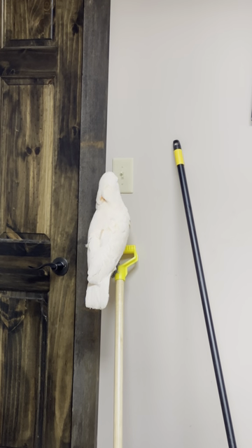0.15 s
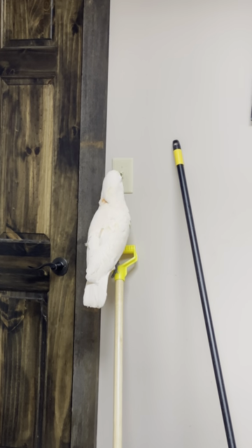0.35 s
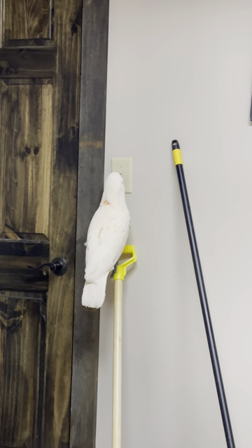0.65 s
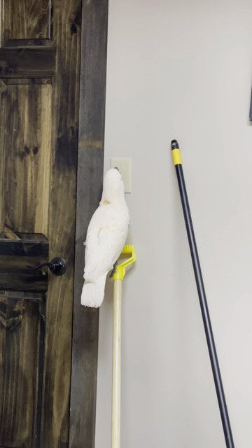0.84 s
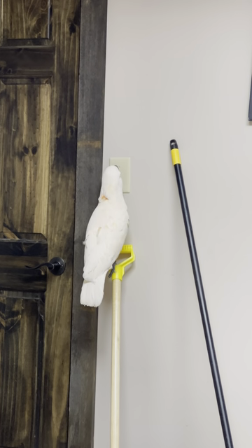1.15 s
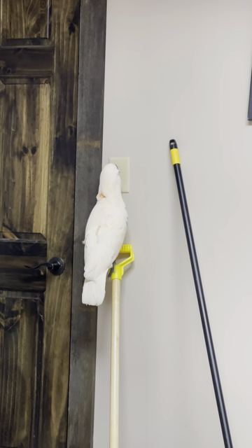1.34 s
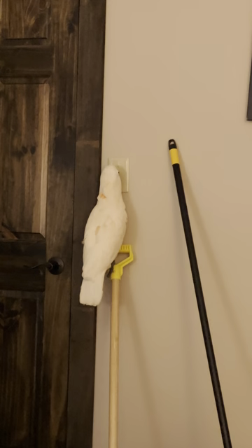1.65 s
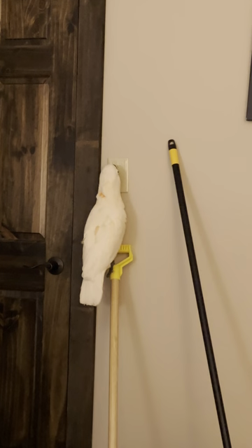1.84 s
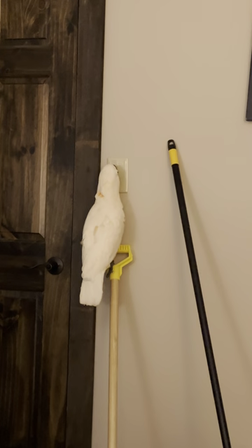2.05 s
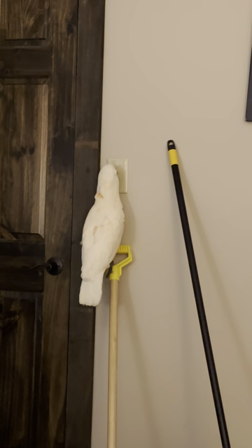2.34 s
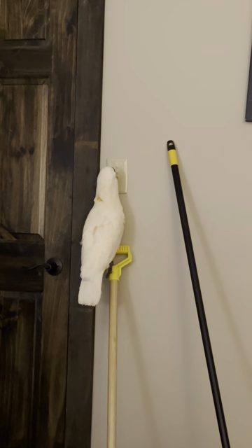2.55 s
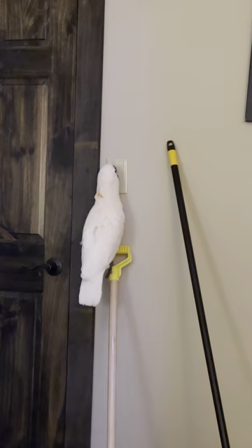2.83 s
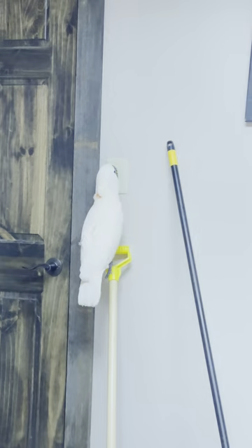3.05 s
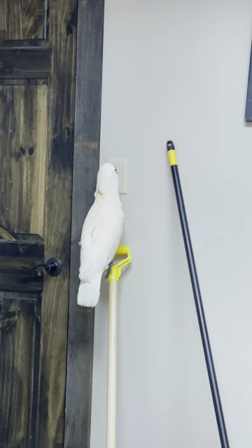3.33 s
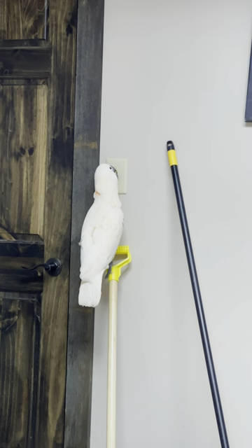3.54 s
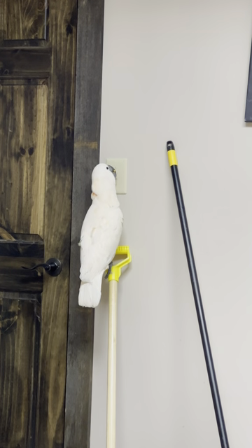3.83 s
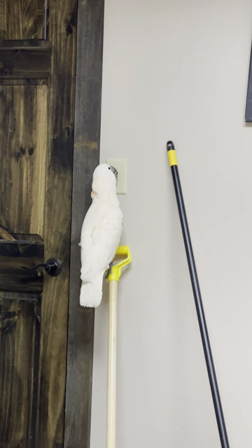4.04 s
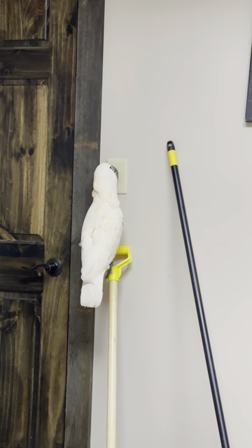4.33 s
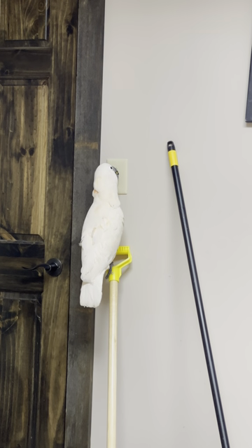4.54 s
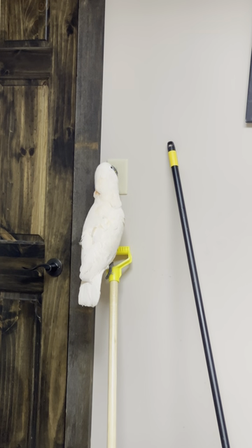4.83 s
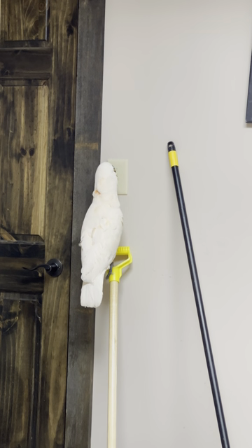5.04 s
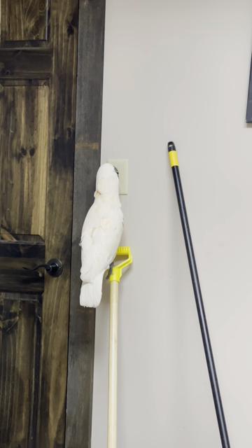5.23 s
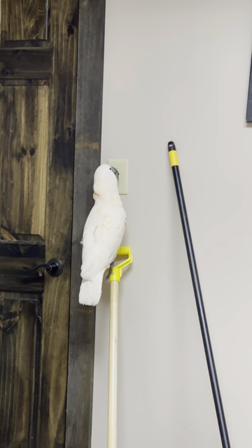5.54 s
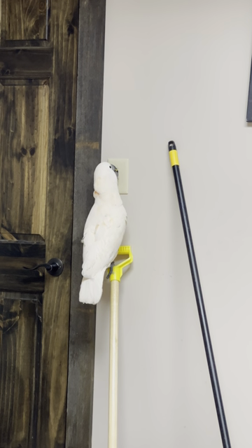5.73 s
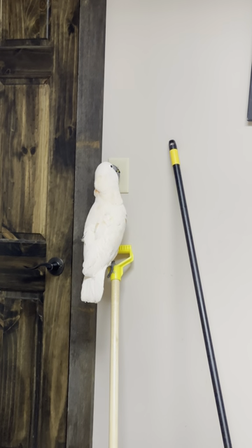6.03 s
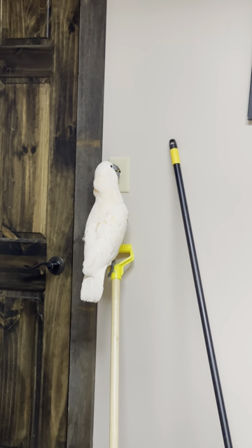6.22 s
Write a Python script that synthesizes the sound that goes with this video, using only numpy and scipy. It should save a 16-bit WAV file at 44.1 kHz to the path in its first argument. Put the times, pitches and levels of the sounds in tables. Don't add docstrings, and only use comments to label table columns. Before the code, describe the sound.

Close, dry beak knocks on a plastic switch plate arrive in irregular clusters, each with a small click, a hollow wall thump and a brief indoor echo. Scratchy slides fill some gaps. The toggle clacks loudly early on and several times near the end. Behind it lie steady soft room rumble, slight microphone hiss and a very faint high electrical whine.

```python
import sys
import numpy as np
from scipy import signal
from scipy.fft import rfft, irfft
from scipy.io import wavfile
from scipy.ndimage import uniform_filter1d

SR = 44100
rng = np.random.default_rng(int(sys.argv[2]) if len(sys.argv) > 2 else 0)


def volts(x):
    e = np.asarray(x, float) / 20
    return 10 ** e


def unload_wav(signal):
    wavfile.write(
        sys.argv[1],
        SR,
        np.round(np.clip(np.atleast_2d(signal).T, -1, 1) * 32767).astype(np.int16),
    )


N = 281358

# f/Hz, level/dB
EDGE_CLICK = [(800, -35.5), (1300, -16), (1650, 4), (2000, 2.5), (2700, 5), (3500, -2), (4400, -6.5),
              (5500, -10.5), (8000, -31)]


def evened(x):
    return x / np.sqrt(np.mean(x ** 2) + 1e-20)


def read(points, hz):
    f, value = np.transpose(points)
    return np.interp(np.log(hz + 1), np.log(f + 1), value)


def add(mix, s, sound):
    part = mix[round(s * SR):][:len(sound)]
    part += sound[:len(part)]


def colour(x, points):
    size = x.shape[-1]
    return irfft(rfft(x) * volts(read(points, np.fft.rfftfreq(size, 1 / SR))), size)


def background():
    # f/Hz, density/dB per Hz
    rumble_spectrum = [(12, -26), (20, -2), (123, -7.5), (166, -9.5), (256, -16), (292, -23), (430, -27),
                       (501, -29), (805, -29), (937, -40), (1100, -37.5), (1300, -44.5), (1720, -49),
                       (1950, -53), (3500, -62), (4550, -100), (7700, -120)]
    # f/Hz, level/dB
    whine_spectrum = [(9200, -27), (9700, -22.5), (10100, 1.5), (10350, 7.5), (10600, -39.5), (10800, -52)]
    rumble, hiss, whine = rng.standard_normal((3, 2, N))
    fade = volts(-53.5 - 0.72 * np.arange(N) / SR)
    rumble = fade * evened(colour(rumble, rumble_spectrum))
    hiss = volts(-90) * colour(hiss, [(2000, 7.0), (5000, -1.5), (9300, 3.5), (10800, -33)])
    whine = volts(-73) * evened(colour(whine, whine_spectrum))
    return rumble + hiss + whine


def room(noise):
    # f/Hz, t60/s
    decay = [(100, 1), (200, 0.32), (400, 0.36), (1000, 0.21), (2800, 0.25), (5000, 0.21), (8000, 0.19),
             (12000, 0.078)]
    # f/Hz, level/dB
    late_decay = [(500, -30.5), (1000, -36), (1400, -24.5), (1900, -42), (3000, -46.5), (6000, -36.5)]
    late_t60 = 0.41
    hz, t, z = signal.stft(noise, SR, nperseg=256)
    early = volts(-60 * t / read(decay, hz)[:, None])
    late = volts(read(late_decay, hz)[:, None] - 60 * t / late_t60)
    tail = signal.istft(z * (early + late), SR, nperseg=256)[1]
    t = np.arange(tail.shape[1]) / SR
    tail = tail * np.clip((t - .001) / 0.0071, 0, 1)
    return tail / np.linalg.norm(tail[0])


def ring(modes):
    t = np.arange(12000) / SR
    body = sum(volts(db - 60 * t / t60) * np.sin(2 * np.pi * hz * t) for hz, db, t60 in modes)
    return body / abs(body).max()


def click(points):
    log_gain = np.log(volts(read(points, abs(np.fft.fftfreq(8192, 1 / SR)))))
    pulse = np.fft.ifft(np.exp(np.conj(signal.hilbert(log_gain)))).real[:2048]
    return pulse / abs(pulse).max()


def strike(drive, pulse):
    out = signal.fftconvolve(drive, pulse)[:len(drive)]
    return out / abs(out).max()


def contact(noise, length, grit_db):
    t = np.arange(len(noise)) / SR
    length = max(length, .0003)
    grit = volts(grit_db * evened(uniform_filter1d(noise[::-1], size=24)))
    swell = 1 - np.exp(-t / (0.22 * length))
    return noise * grit * swell * np.exp(-t / length)


def detuned(modes, chance, spread_db):
    return [(hz, db + spread_db * a, t60) for (hz, db, t60), a in zip(modes, chance)]


def boom(db, hz, t60, swell):
    t = np.arange(30000) / SR
    return volts(db - 60 * t / t60) * (1 - np.exp(-t / swell)) * np.sin(2 * np.pi * hz * t) * 2


def cavity_booms():
    # t/s, level/dB
    firm_blows = [(0.461, -48), (0.639, -61), (0.959, -50.5), (1.152, -50), (1.561, -51.5), (3.311, -45.5),
                  (3.822, -51.5), (4.009, -48.5), (4.202, -49.5), (4.37, -43), (4.9, -47.5), (5.158, -45),
                  (5.719, -44), (5.812, -44), (5.94, -50), (6.272, -55)]
    return [(s, boom(db, hz=154.14, t60=0.42, swell=0.03)) for s, db in firm_blows]


def frame_jolt():
    # level/dB, f/Hz, t60/s, swell/s
    frame_modes = [(-34, 286, .26, 0.048), (-35.5, 229, 0.29, 0.022), (-48.5, 91.2, 0.56, 0.016),
                   (-45, 150, 0.11, 0.0027)]
    return [(0.01894, boom(*mode)) for mode in frame_modes]


def wall(drive, chance):
    # f/Hz, level/dB
    thump = [(60, -38.5), (150, 6), (250, 0.5), (450, 6.5), (800, -1), (1280, -9), (1500, -31), (3000, -55)]
    # f/Hz, level/dB, t60/s
    panel = [(120.4, -2.5, 0.63), (230, 3, 0.087), (366, 9, 0.24), (402, -16.5, 0.03), (499.8, -3.5, 0.77),
             (582, -25, 0.037), (679.6, 9.5, 0.1), (1020, -1, 0.18)]
    hum = strike(drive, ring(detuned(panel, chance, 4)))
    return strike(drive, click(thump)) + volts(-10.5) * hum


def bright(drive, db):
    # f/Hz, level/dB
    tick = [(2500, -13), (3900, -8.5), (4500, -2), (5200, -3), (6000, -5.5), (7500, -2.5), (9000, -4.5),
            (10000, -26), (12000, -42)]
    # f/Hz, level/dB
    sheen = [(7000, -56.5), (8500, 16.5), (10300, 12), (11300, 12), (12300, -7.5), (13500, -55)]
    sheen_db = min(.8 * (db + 35.0), 3)
    return volts(db) * (strike(drive, click(tick)) + volts(sheen_db) * strike(drive, click(sheen)))


def spots():
    # t/s, level/dB, f/Hz
    accents = [(0.017, -38.5, 3360), (.018, -37, 512), (.459, -56, 1190), (.592, -54.5, 1220),
               (.637, -58, 1200), (1.917, -48.5, 1320), (2.829, -44.5, 1170), (3.308, -50, 1180),
               (4.012, -61, 1200), (5.157, -36.5, 1430), (5.939, -34.5, 1350), (.802, -57, 4180),
               (1.152, -46.5, 1300), (1.398, -64.5, 1320), (1.858, -52, 1370), (2.073, -52.5, 1550),
               (2.336, -56, 2400), (2.498, -54.5, 1020), (4.372, -39, 694), (.643, -57.5, 2700),
               (4.901, -35, 4770), (4.915, -45, 4360), (5.583, -75, 2720), (.958, -50.5, 1240),
               (1.272, -69, 2620), (4.372, -54.5, 1250)]
    # f/Hz, level/dB, t60/s
    box = [(10100, -40, 0.0086), (1530, -33.5, 0.014), (4050, -43.5, .03), (727, -35.5, .05),
           (775, -37, .07), (1800, -39.5, .03), (2500, -48, 0.031), (4030, -57, 0.16), (4200, -60.5, 0.12)]
    # f/Hz, level/dB, t60/s
    box_hum = (1020, -40, .13)
    rung = []
    for s, db, hz in accents:
        t60 = 0.019 * (1000 / hz) ** 0.37
        rung.append((s, volts(db) * ring([(hz, 0, t60)])))
    rung += [(1.558, volts(db) * ring([(hz, 0, t60)])) for hz, db, t60 in box + [box_hum]]
    return [(s, sound, volts(-1) * sound) for s, sound in rung]


def slides():
    # t/s, level/dB, wall thud re level/dB, contact/s
    scrapes = [(0.7983, -55.5, 1.5, 0.011), (0.8726, -55, -2, 0.024), (1.0555, -62, 3, 0.014),
               (1.6989, -66, 2, 0.046), (1.7998, -58.5, 11.5, 0.0097), (1.9398, -64, 17, 0.014),
               (2.4356, -65, 8, 0.026), (2.7127, -71.5, 11, 0.014), (2.7373, -53.5, -30, 0.023),
               (2.7595, -55, 1.5, 0.014), (2.789, -53.5, -5.5, 0.029), (3.1119, -55, -2.5, 0.02),
               (3.1394, -58.5, -1.5, 0.009), (3.1998, -68, -1, 0.021), (3.283, -59.5, -2, 0.011),
               (3.6106, -75, 8, 0.015), (4.2182, -49.5, -8.5, 0.017), (5.2912, -61.5, 8, 0.0033),
               (5.4912, -66, 11.5, 0.0067), (5.7345, -47, 0, 0.014), (6.217, -70, -12, 0.039),
               (6.281, -74, 3, 0.0023)]
    # t/s, level/dB, f/Hz, wall thud re level/dB, tick re level/dB
    flicks = [(0.152, -64.5, 4460, -12, -35), (2.4874, -59.5, 4700, 0, -20), (3.111, -58, 3760, -1, -21),
              (2.708, -68, 3280, 0, -25), (3.5, -73.5, 2500, -2.5, -20), (3.7188, -80, 1860, 11, 1.5),
              (4.8928, -46, 2420, -4, -2), (5.5814, -68, 2580, -18, -15), (6.167, -70.5, 2560, -3, -3)]
    # t/s, level/dB, f/Hz,
    # length/s
    soft_sounds = [(1.738, -69.5, 2500, 0.035), (3.81, -55, 1800, 0.017), (4.188, -56, 1500, 0.016),
                   (5.5, -74, 2300, .05), (0.898, -71, 2720, 0.032), (6.26, -63, 2200, 0.015),
                   (.5, -75.5, 2600, 0.033), (0.661, -66, 2000, 0.021), (3.19, -74.5, 3170, .05),
                   (5.201, -62.5, 1380, 0.081), (5.3, -61, 1350, 0.75), (6.02, -67.5, 1270, 0.13)]
    tick_db, soft_thud_db, flick_s = -42, -3, 0.019
    spot = 2130 * (1 + 0.054 * rng.standard_normal(len(scrapes)))
    return ([(s, db, hz, thud, tick_db, length) for (s, db, thud, length), hz in zip(scrapes, spot)]
            + [(*row, flick_s) for row in flicks]
            + [(s, db, hz, soft_thud_db, tick_db, length) for s, db, hz, length in soft_sounds])


def scrape(row, noise):
    s, db, hz, thud_db, tick_db, length = row
    slips = contact(noise[0], length, 2.97)
    plastic = strike(slips, ring([(hz, 0, .003)])) + 0.13 * strike(slips, click(EDGE_CLICK))
    thud = volts(thud_db + 1.5) * wall(slips, noise[1])
    return volts(db) * (plastic + thud) + bright(slips, db + tick_db + 3.5)


def toggle_ping():
    # f/Hz, level/dB, t60/s
    toggle = [(1615, 0, .014), (1150, -9, .01), (3950, -9, .02), (5460, -11, .015), (6780, -16, .012),
              (8000, -22, .008)]
    ping = volts(-43) * strike(np.pad(np.hanning(11), (20, 4000)), ring(toggle))
    return [(5.4105, ping, volts(-17) * ping)]


def knocks():
    # t/s, plate/dB, edge re plate/dB, tick re plate/dB, plate f/Hz
    snaps = [
        (1.55, -37.5, 0.5, -7, 925),
        (1.556, -35, -4.5, -25, 1010),
        (4.901, -40.5, -17, -11.5, 760),
        (4.911, -41.5, -16, -44, 1014),
        (5.156, -33, -11.5, -22.5, 1310),
        (5.936, -33.5, -9, -18.5, 1296),
    ]
    # t/s, plate/dB, edge re plate/dB, tick re plate/dB, plate f/Hz
    pecks = [(0.015, -45, 5, -10.5, 1480), (1.269, -62.5, -6, -10, 970), (3.955, -59, 7, -22, 957),
             (4.196, -53, -3, -24, 1370), (4.335, -57.5, 4.5, -15.5, 1090), (5.723, -50, 0, -7.5, 1010)]
    # t/s, plate/dB, wall thud re plate/dB, plate f/Hz
    pushes = [(0.458, -54.5, 9.5, 750), (0.637, -46.5, 1.5, 905), (1.397, -68.5, 3, 1340),
              (1.484, -65.5, 12.5, 835), (1.729, -56.5, 10, 904), (2.272, -72, 19, 790),
              (3.498, -64, 14.5, 740), (6.261, -58.5, 9, 743)]
    # t/s, plate/dB, wall thud re plate/dB, edge re plate/dB, plate f/Hz
    taps = [(0.591, -56.5, 2.5, -12, 1250), (0.747, -42.5, -3.5, -9, 830), (0.959, -44, -4, -11.5, 785),
            (1.148, -52.5, 0.5, -7.5, 1310), (1.86, -52, -4, -7.5, 1660), (1.916, -51, -1.5, -13, 830),
            (2.011, -53.5, -2.5, -7, 925), (2.072, -49.5, -7, -11, 1360), (2.329, -57.5, 0.5, -5, 1050),
            (2.829, -51.5, 4.5, -4, 776), (2.889, -55.5, -10, -1.5, 885), (3.309, -39.5, -2, -15, 767),
            (3.817, -53.5, 5, -1, 840), (3.871, -51, 0.5, -1.5, 1370), (4.008, -52.5, 9, -10.5, 1220),
            (4.371, -45, 7, -8.5, 1250), (5.809, -53, 3.5, -0.5, 815)]
    snap_thud_db, peck_thud_db, push_edge_db, push_tick_db, tap_tick_db = -8, 4.5, -27, -44, -39
    return ([(s, db, snap_thud_db, edge, tick, hz) for s, db, edge, tick, hz in snaps]
            + [(s, db, peck_thud_db, edge, tick, hz) for s, db, edge, tick, hz in pecks]
            + [(s, db, thud, push_edge_db, push_tick_db, hz) for s, db, thud, hz in pushes]
            + [(s, db, thud, edge, tap_tick_db, hz) for s, db, thud, edge, hz in taps])


def knock(row, noise):
    s, db, thud_db, edge_db, tick_db, hz = row
    blow = np.pad([1.], (0, len(noise[0]) - 1))
    rattle = contact(noise[0], 0.0025, 15.0)
    plate_modes = ring([(hz, 0, .018), (hz * 1.345, -4, .01)])
    plate = volts(db + 0.5) * strike(np.pad(np.hanning(24), (0, 11976)), plate_modes)

    def rest(drive):
        thud = volts(thud_db) * wall(drive, noise[1])
        edge = volts(edge_db + 3) * strike(drive, click(EDGE_CLICK))
        return volts(db) * (thud + edge) + bright(drive, db + tick_db + 12)

    direct = volts(4) * plate + volts(-1.0) * rest(rattle)
    send = volts(-0.5) * plate + volts(7.0) * rest(blow)
    return direct, send


def beak():
    paths = 12
    out, sends = np.zeros((2, N)), np.zeros((paths, N))
    tails = rng.standard_normal((paths, 2, 20000))
    sounds = toggle_ping()
    sounds += [(row[0], *knock(row, rng.standard_normal((2, 12000)))) for row in knocks()]
    for row in slides():
        slid = scrape(row, rng.standard_normal((2, 12000)))
        sounds.append((row[0], slid, volts(-2.0) * slid))
    sounds += spots()
    for k, (s, direct, send) in enumerate(sounds):
        add(out[0], s, direct)
        add(sends[k % paths], s, send)
    for send, noise in zip(sends, tails):
        echo = signal.oaconvolve(send[None], room(noise), axes=1)[:, :N]
        out += volts([[0], [1.5]]) * echo
    for s, sound in cavity_booms() + frame_jolt():
        add(out[0], s, sound)
    return out


def ports(streams, same, left_db):
    # f/Hz, lead/rad
    lead = [(0, 0), (350, .05), (700, -.2), (1400, -.1), (2400, .6), (3800, .8), (4150, .95), (4500, 1.55),
            (5170, 4.7), (5500, 5.9), (5860, 6.3), (8270, 8.9), (10300, 10.5), (12400, 12.6)]
    hz = np.fft.rfftfreq(N, 1 / SR)
    a, b = rfft(streams)
    c = np.clip(read(same, hz), 0, 1)
    half = volts(read(left_db, hz) / 2) * np.exp(.5j * read(lead, hz))
    own, other = np.sqrt((1 + c) / 2) * a, np.sqrt((1 - c) / 2) * b
    return irfft(np.array([(own + other) * half, (own - other) / half]), N)


def scene():
    # f/Hz, coherence/1
    same_near = [(150, 1), (350, 0.95), (600, 0.77), (1300, 0.61), (1800, 0.98), (4000, 1), (5000, 0.73),
                 (6000, 1), (12000, 0.98)]
    # f/Hz, coherence/1
    same_far = [(60, 0.99), (150, 1), (350, 0.7), (600, 0.3), (1100, 0.17), (1700, 0.93), (3000, 1),
                (5000, 0.7), (6000, 1), (10000, 1)]
    # f/Hz, level/dB
    left_near = [(150, -0.5), (400, 1.4), (750, 4), (1300, 2.5), (2000, 0.5), (4000, -0.2)]
    near = ports(beak(), same_near, left_near)
    far = ports(background(), same_far, [(800, 0.17), (1200, 1.9), (2000, 0.21)])
    return near + far


def band_limit(x):
    return signal.sosfilt(signal.butter(12, 12730, fs=SR, output="sos"), x)


def record(dry):
    thin = signal.sosfilt(signal.butter(3, 40, "high", fs=SR, output="sos"), dry)
    return band_limit(thin)


dry = scene()
out = record(dry)
unload_wav(out)
```